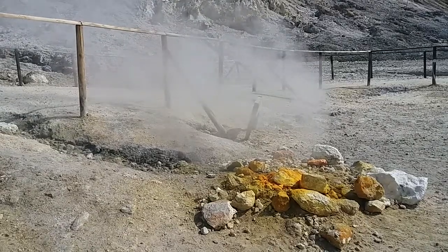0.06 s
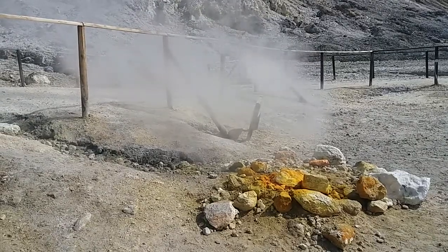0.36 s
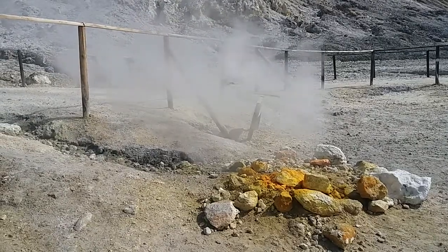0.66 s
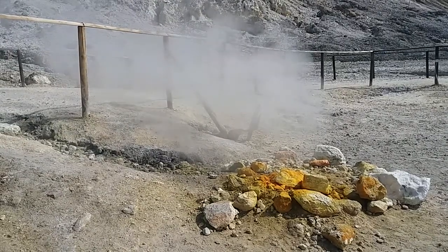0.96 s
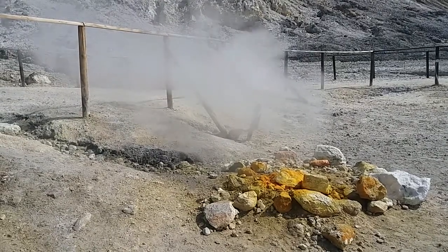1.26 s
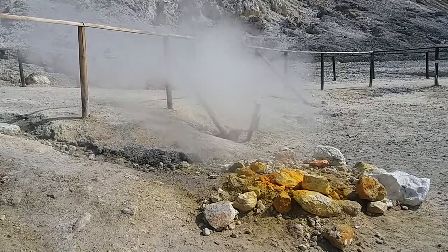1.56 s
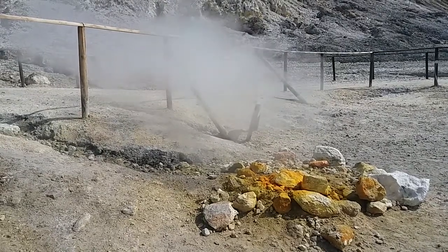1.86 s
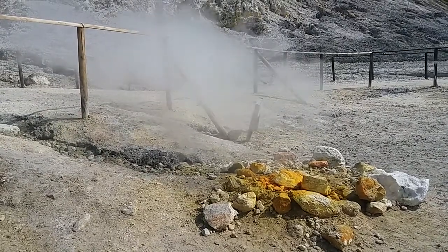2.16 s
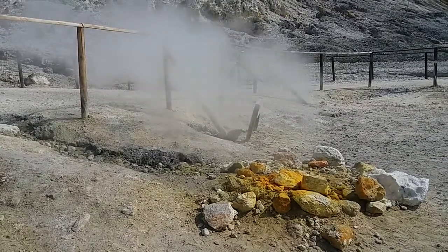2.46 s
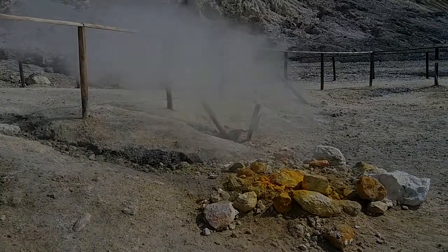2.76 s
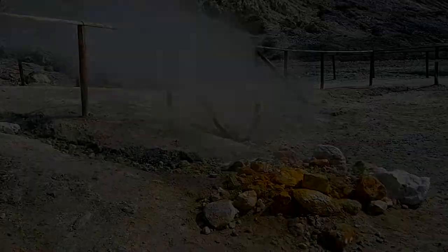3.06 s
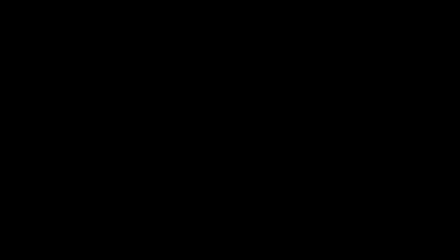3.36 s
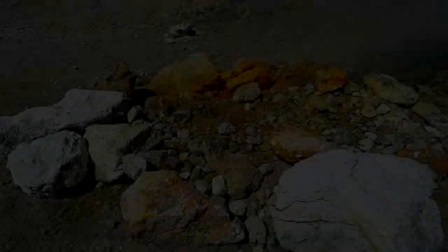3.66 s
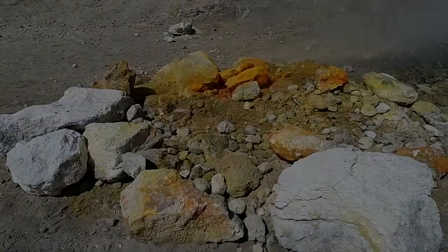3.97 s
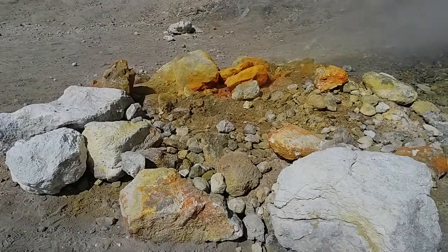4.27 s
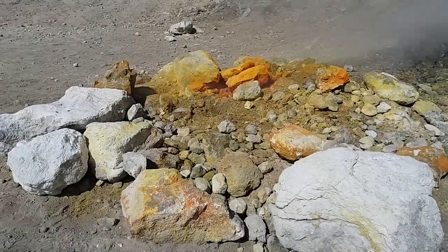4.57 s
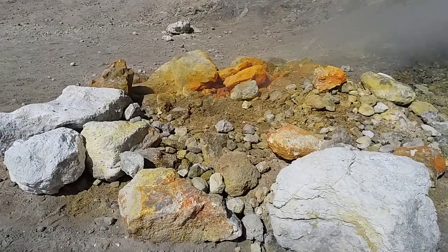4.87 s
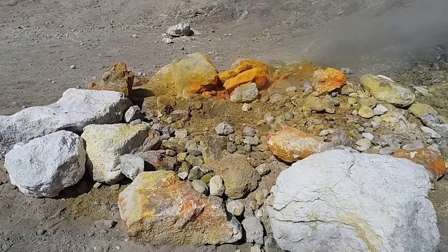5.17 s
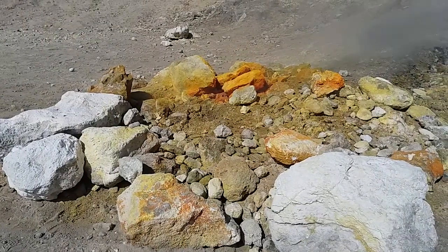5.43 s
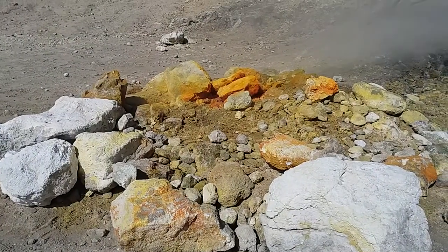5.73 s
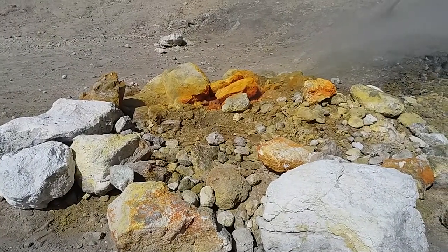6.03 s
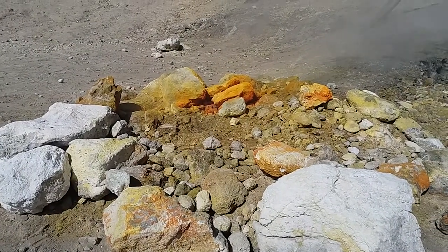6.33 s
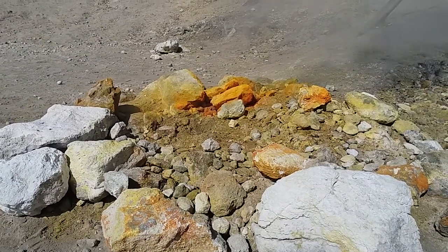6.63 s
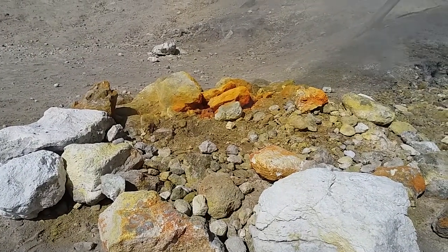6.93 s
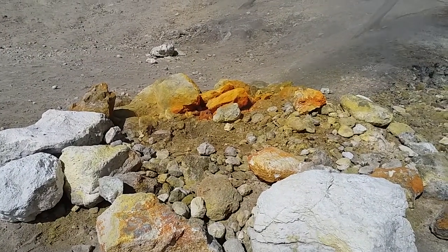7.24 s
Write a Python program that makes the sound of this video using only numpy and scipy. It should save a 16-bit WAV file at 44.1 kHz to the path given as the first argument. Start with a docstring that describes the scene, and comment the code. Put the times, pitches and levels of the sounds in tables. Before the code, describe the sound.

A volcanic vent's even, rushing hiss fades out and back in, now with wind gusts fluttering and buffeting the microphone.

```python
"""Steam hisses from a fumarole a few metres away, then, after a fade through silence, from beside the vent.
The turbulent jet radiates broadband noise, coloured by resonances of the hollows between the rocks.
Wind sheds eddies across the single microphone: their pressure rumbles, flutters and thumps,
and the recorder's gain control ducks the hiss under the strongest of them."""
import sys
import numpy as np
from scipy import signal
from scipy.fft import rfft, irfft, next_fast_len
from scipy.io import wavfile
from scipy.ndimage import uniform_filter1d

SR = 44100
rng = np.random.default_rng(int(sys.argv[2]) if len(sys.argv) > 2 else 0)


def log_audio(samples):
    """Write samples as a 16-bit WAV file to the path given in sys.argv[1]."""
    # one column per channel
    frames = np.atleast_2d(samples).T
    # limit to full scale, then quantise
    limited = np.clip(frames, -1, 1)
    pcm = np.round(limited * 32767).astype(np.int16)
    wavfile.write(sys.argv[1], SR, pcm)


N = 321930
TIME = np.arange(N) / SR
FFT_SIZE = next_fast_len(N + 8192)
FREQS = np.maximum(np.arange(FFT_SIZE // 2 + 1) * SR / FFT_SIZE, 1)


def from_db(db):
    """Amplitude grows tenfold for every 20 dB."""
    return 10 ** (np.asarray(db) / 20)


def ramp(silent_s, length_s):
    """Linear fade from 0 at silent_s to 1 over length_s; a negative length falls to 0 there."""
    return np.clip((TIME - silent_s) / length_s, 0, 1)


def filtered(x, response):
    """Zero-phase filtering: the spectrum is multiplied by a real frequency response."""
    return irfft(rfft(x, FFT_SIZE) * response, FFT_SIZE)[:N]


def unit_rms(x):
    """Normalisation to a mean power of 1."""
    return x / np.sqrt(np.mean(x ** 2) + 1e-20)


def drift(rate_hz):
    """Random modulation: noise low-passed at rate_hz wanders with an rms of 1."""
    return unit_rms(filtered(rng.standard_normal(FFT_SIZE), 1 / (1 + (FREQS / rate_hz) ** 4)))


def coloured(x, spectrum, resonances=()):
    """Source and filter: x takes on a smooth spectrum with bell-shaped peaks and dips; rms 1."""
    hz, level_db = np.transpose(spectrum)
    response_db = np.interp(np.log(FREQS), np.log(hz), level_db)
    for centre, width, lift_db in resonances:
        response_db += lift_db * np.exp(-(2 * (FREQS - centre) / width) ** 2)
    return unit_rms(filtered(x, from_db(response_db)))


def evened(x, window_s):
    """Division by the running rms holds the slow level at 1 and keeps the fast fluctuations."""
    return x / np.sqrt(uniform_filter1d(x ** 2, int(window_s * SR)) + 1e-6)


def steam_jet(spectrum, resonances, sputter_db, crossover_hz):
    """Turbulent mixing makes broadband noise: a smooth roar, and above it a bright spray that sputters."""
    jet = coloured(rng.standard_normal(FFT_SIZE), spectrum, resonances)
    roar = signal.sosfiltfilt(signal.butter(2, crossover_hz, fs=SR, output="sos"), jet)
    spray = jet - roar
    return roar + spray * from_db(sputter_db * drift(rate_hz=12))


def far_steam():
    """Cavity resonances among the rocks colour the jet, heard from a few metres away."""
    # smooth jet spectrum: (frequency [Hz], relative density [dB])
    spectrum = [(40, -22.5), (80, -5.5), (190, -0.5), (500, -14.5), (1500, -11.5), (2700, -20.5),
                (4500, -18), (7000, -26), (10000, -37), (13500, -44.5), (15500, -46)]
    # resonances and notches: (centre [Hz], width [Hz], gain [dB])
    resonances = [(349, 240, 8), (622, 211, 6), (887, 455, 6), (1257, 320, 8), (1796, 309, 5.5),
                  (2074, 130, -6.5), (2315, 323, 4.5), (3061, 680, 5), (3833, 320, 6.0), (4445, 570, 7),
                  (4760, 206, -6.5), (5010, 256, -7.5), (5180, 160, 1.5), (5540, 260, -8.5),
                  (6330, 413, 7.5), (7120, 302, -8.5), (7190, 651, 10), (8266, 217, -1), (8911, 883, 0.5),
                  (10000, 521, -5)]
    # strength of the jet: (time [s], relative level [dB])
    flow = [(0.0, -44), (0.46, -45), (1.17, -44), (2.45, -45)]
    level_db = np.interp(TIME, *np.transpose(flow)) + 4
    return from_db(level_db) * steam_jet(spectrum, resonances, sputter_db=0.58, crossover_hz=2500)


def wind_envelope(starts, lengths, levels_db, attack_s=0.024, release_s=0.073):
    """Incoherent sources add in power; each gust builds quickly, holds and dies more slowly."""
    power = 0
    for start, length, db in zip(starts, lengths, levels_db):
        rise = ramp(start - attack_s, attack_s)
        decay = ramp(start + length + release_s, -release_s) ** 2
        power += (from_db(db) * rise * decay) ** 2
    return np.sqrt(power)


def rumble(spectrum, spread_db):
    """Pseudo-sound: large eddies press directly on the microphone in uneven lumps."""
    pressure = coloured(rng.standard_normal(FFT_SIZE), spectrum)
    return evened(pressure * from_db(spread_db * drift(rate_hz=40)), window_s=0.066)


def breeze():
    """Weak turbulence only rumbles: light puffs over air that is never quite still."""
    # pressure spectrum of light air: (frequency [Hz], relative density [dB])
    spectrum = [(22, -37), (40, -14.5), (60, -3), (90, 1.5), (150, -9), (300, -14), (800, -34), (3000, -72)]
    # puffs of air: (start [s], length [s], relative level [dB])
    puffs = [(0.06, 0.024, -42.5), (0.265, 0.027, -36), (0.73, 0.024, -46), (0.97, 0.041, -54),
             (1.155, 0.022, -51), (1.92, 0.11, -43), (2.04, 0.022, -32), (2.41, 0.046, -45.5),
             (2.98, 0.035, -43.5)]
    starts, lengths, levels_db = np.transpose(puffs)
    strength = from_db(-61) + wind_envelope(starts, lengths, levels_db - 2)
    return strength * rumble(spectrum, spread_db=2.0)


def thumps():
    """A passing eddy makes a bipolar pressure pulse; smaller ones pass faster and sound higher."""
    # single strong eddies: (time [s], relative peak level [dB], pitch [Hz])
    eddies = [(0.283, -40, 113), (2.065, -22, 87), (4.051, -28, 292), (4.249, -13, 275),
              (4.327, -26.5, 344), (4.374, -20.5, 300), (4.546, -24, 136), (5.177, -28, 147),
              (5.25, -26, 175), (5.289, -26, 335), (5.417, -23, 154), (5.438, -21, 245), (5.867, -26, 261),
              (5.893, -16.5, 236), (5.909, -23, 253), (6.01, -16.5, 220), (6.239, -21.5, 271),
              (6.783, -25, 368), (6.822, -24, 380), (7.04, -17, 188), (7.136, -21.5, 409),
              (7.177, -23, 426), (7.189, -19, 445)]
    pressure = np.zeros(N)
    for (time_s, peak_db, hz), sign in zip(eddies, rng.choice([-1, 1], len(eddies))):
        passing = np.abs(TIME - time_s) < 0.03
        phase = 2 * np.pi * hz * (TIME[passing] - time_s)
        pulse = phase * np.exp((1 - phase ** 2) / 2)   # slope of a Gaussian, peaks at +1 and -1
        pressure[passing] += sign * from_db(peak_db - 1) * pulse
    return pressure


def near_steam():
    """Colour depends on the listening position: beside the vent the steady jet sounds brighter."""
    # smooth jet spectrum: (frequency [Hz], relative density [dB])
    spectrum = [(40, -13), (90, 5.5), (220, 1.5), (400, -8.5), (1400, -11), (2700, -15.5), (4500, -14),
                (7500, -15), (9300, -30.5), (12000, -32.5), (15500, -46)]
    # resonances and notches: (centre [Hz], width [Hz], gain [dB])
    resonances = [(654, 314, 11), (1125, 370, 10.5), (1636, 216, 10.5), (1968, 155, 7.5), (2180, 300, 5.5),
                  (2680, 135, -8), (2990, 200, -4), (3763, 490, 3), (4445, 1140, 7), (5400, 250, 4),
                  (5610, 180, -5), (6050, 180, -3), (6980, 240, 2.5), (8087, 987, 2.5), (10554, 1719, 4)]
    return from_db(-44) * steam_jet(spectrum, resonances, sputter_db=1.77, crossover_hz=2788)


def flutter(pops_per_s, spread_db):
    """Shot noise: small eddies break on the microphone port at random, each a pop of its own size."""
    # spectrum of one pop: (frequency [Hz], relative density [dB])
    spectrum = [(60, -19), (180, -2), (330, 1), (500, -1.5), (750, -6.5), (1100, -14.5), (1800, -28),
                (5000, -66)]
    arrivals = rng.random(N) < pops_per_s / SR
    sizes = from_db(spread_db * np.minimum(rng.exponential(1, N), 3))
    signs = rng.choice([-1, 1], N)
    return evened(coloured(arrivals * sizes * signs, spectrum), window_s=0.083)


def gusting_wind():
    """Turbulence grows with wind speed: gusts rumble, and their flutter rises faster than the rumble."""
    # gusts beside the vent: (start [s], length [s], rumble level [dB], extra flutter [dB])
    gusts = [(3.847, 0.014, -53, -2), (3.996, 0.092, -38.5, -3), (4.127, 0.047, -35.5, 4),
             (4.223, 0.054, -29.5, -2.5), (4.33, 0.12, -35, 3.5), (4.518, 0.076, -29.5, -0.5),
             (4.6, 0.12, -35, -2.5), (4.867, 0.038, -40, 0), (5.175, 0.18, -33, -4.5),
             (5.243, 0.03, -34, 4.5), (5.412, 0.1, -31, -1), (5.573, 0.12, -37.5, -6),
             (5.791, 0.26, -35.5, -0.5), (5.873, 0.026, -27, -0.5), (6.16, 0.02, -39, -1),
             (6.223, 0.052, -32.5, 1), (6.349, 0.1, -34, 2), (6.504, 0.053, -28, -1.5),
             (6.587, 0.12, -31.5, -0.5), (6.785, 0.042, -30, 3), (6.891, 0.37, -30.5, -2),
             (7.074, 0.082, -33, 9.5)]
    # pressure spectrum of large eddies: (frequency [Hz], relative density [dB])
    spectrum = [(22, -37), (38, -30), (55, -3.5), (85, 0.5), (130, 0.5), (200, -2.5), (300, -8),
                (500, -28.5), (1200, -37), (4000, -81)]
    starts, lengths, rumble_db, extra_db = np.transpose(gusts)
    growth, reference_db = 1.52, -32   # flutter gains `growth` dB per dB of rumble over the reference
    flutter_db = -39.5 + growth * (rumble_db - reference_db) + extra_db
    large_eddies = wind_envelope(starts, lengths, rumble_db) * rumble(spectrum, spread_db=4.0)
    small_eddies = wind_envelope(starts, lengths, flutter_db) * flutter(pops_per_s=500, spread_db=6.0)
    return large_eddies + small_eddies


def gain_control(x, threshold_db, slope, release_db_per_s):
    """Compression: the gain drops by `slope` dB per dB over the threshold, then recovers."""
    level_db = 10 * np.log10(np.abs(uniform_filter1d(x ** 2, size=220)) + 1e-12)   # 5 ms mean power
    excess_db = np.maximum(level_db - threshold_db, 0)
    release_db = release_db_per_s * TIME
    held_db = np.maximum.accumulate(excess_db + release_db) - release_db   # decaying peak hold
    return x * from_db(-slope * uniform_filter1d(held_db, size=180))


def scene():
    """Superposition of steam and wind at one microphone, in two places in turn; both channels alike."""
    fade_out, fade_in = ramp(silent_s=3.417, length_s=-0.93), ramp(silent_s=3.762, length_s=0.51)
    steam = fade_out * far_steam() + fade_in * near_steam()
    wind = fade_out * breeze() + gusting_wind()
    ceiling = 0.115   # the wind's pressure swings round off towards this amplitude
    rounded_wind = ceiling * np.tanh(wind / ceiling)
    return np.tile(steam + rounded_wind + thumps(), (2, 1))


def record(dry):
    """The recorder limits bandwidth and dynamics: a low cut against wind, gain control, a steep top cut."""
    low_cut_hz, top_cut_hz = 42, 15750
    x = signal.sosfilt(signal.butter(4, low_cut_hz, "high", fs=SR, output="sos"), dry[0])
    x = gain_control(x, threshold_db=-29, slope=0.44, release_db_per_s=137)
    x = filtered(x, 1 / np.sqrt(1 + (FREQS / top_cut_hz) ** 400))
    return np.tile(x, (2, 1))


dry = scene()
out = record(dry)
log_audio(out)
```